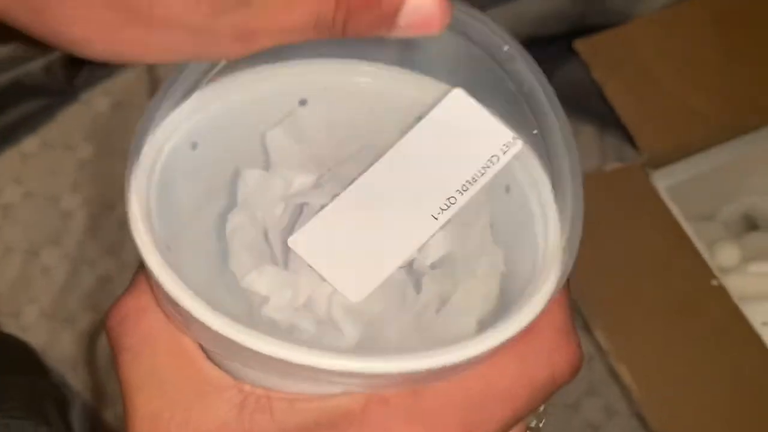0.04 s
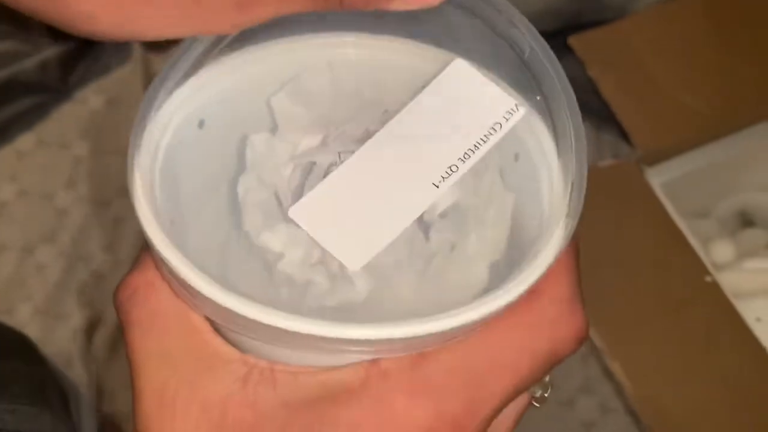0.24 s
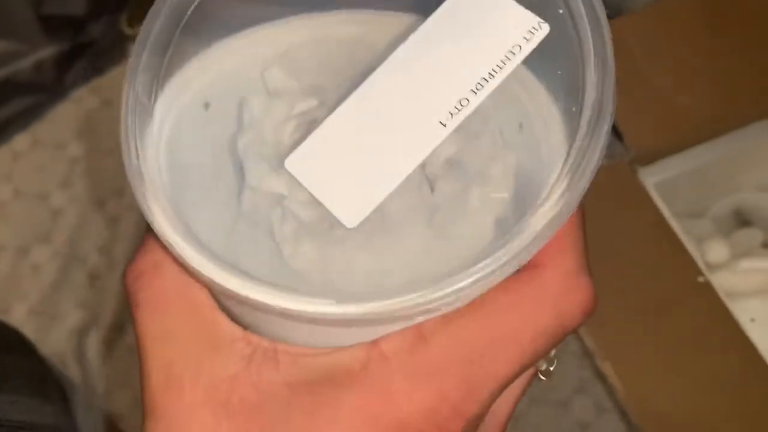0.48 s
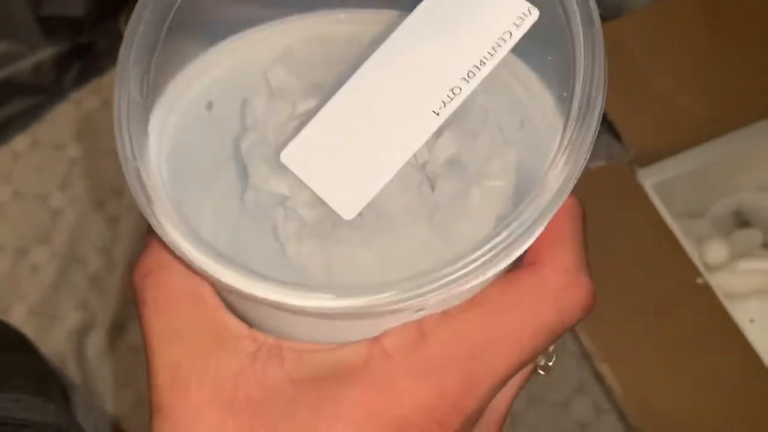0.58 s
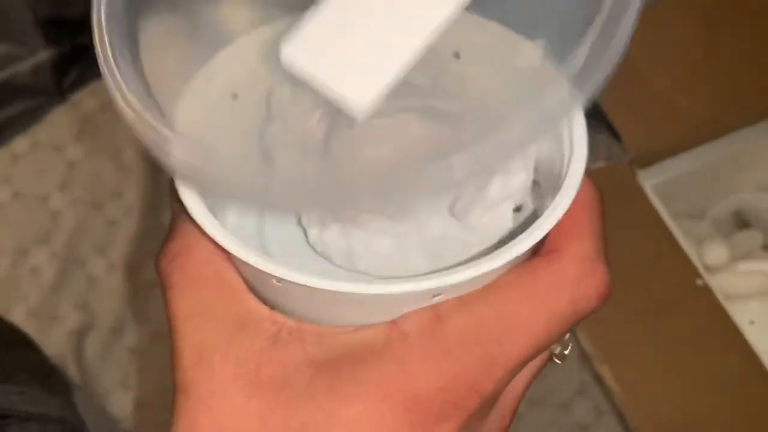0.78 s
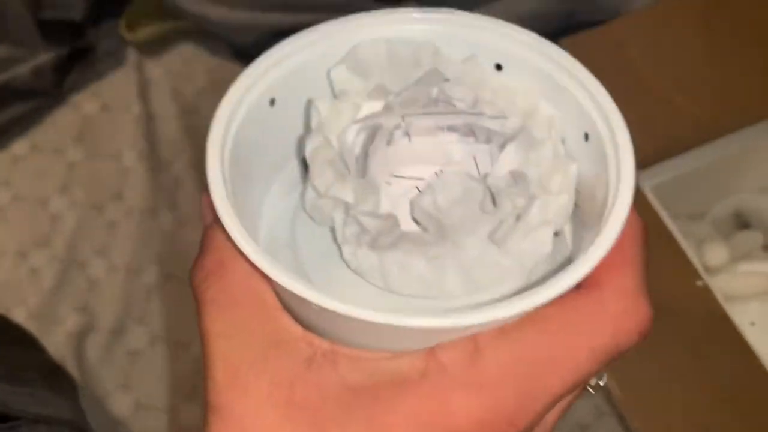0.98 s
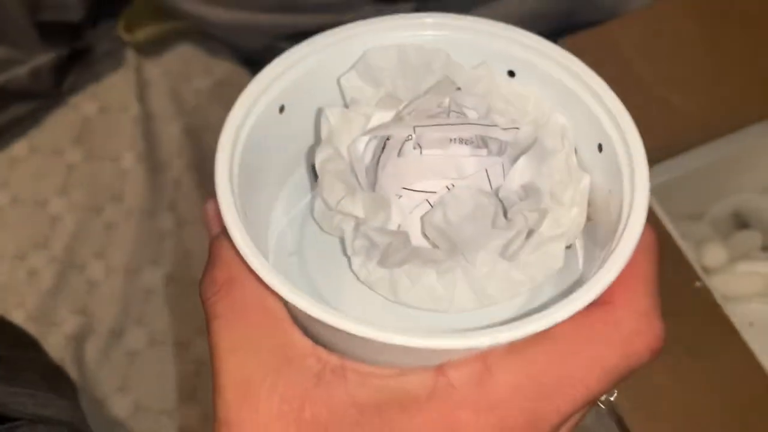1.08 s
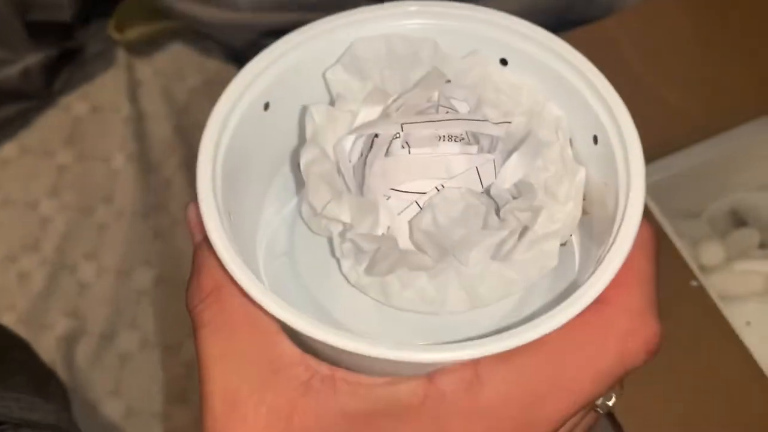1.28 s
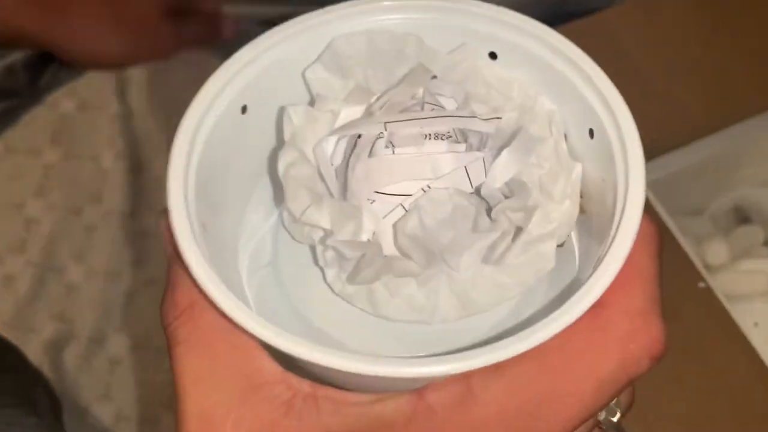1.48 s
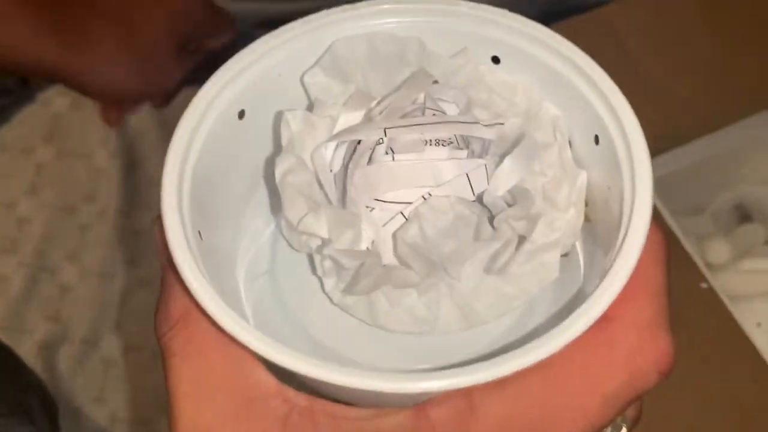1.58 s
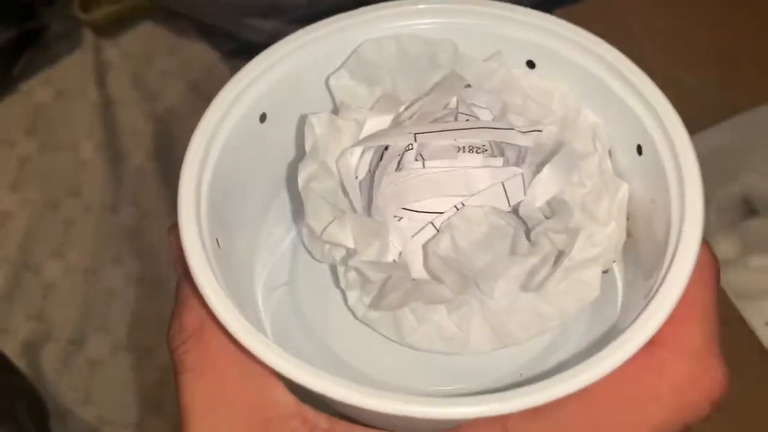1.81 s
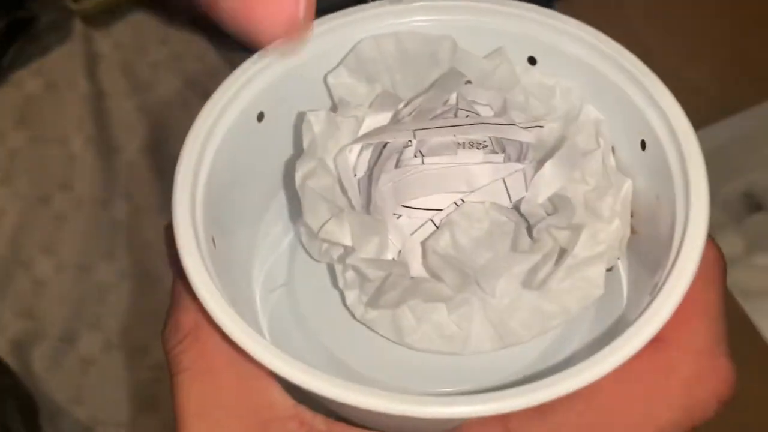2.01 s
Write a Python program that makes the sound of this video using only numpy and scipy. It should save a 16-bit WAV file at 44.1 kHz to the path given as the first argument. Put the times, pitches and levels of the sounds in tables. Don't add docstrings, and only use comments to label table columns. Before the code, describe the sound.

Close to a phone in stereo, a plastic lid creaks and cracks loose from a cup with a low airy thump and very short echo, then soft ticks, scuffs and a muffled knock over faint low hum.

```python
import sys
import numpy as np
from scipy import signal
from scipy.fft import rfft, irfft, next_fast_len
from scipy.io import wavfile
from scipy.ndimage import uniform_filter1d

SR = 44100
rng = np.random.default_rng(int(sys.argv[2]) if len(sys.argv) > 2 else 0)


def materialize(psi):
    bounded = np.clip(np.atleast_2d(psi).T, -1, 1)
    quanta = np.round(bounded * 32767).astype(np.int16)
    wavfile.write(sys.argv[1], SR, quanta)


def volts_from_decibels(level):
    exponent = np.asarray(level, float) / 20
    return 10 ** exponent


N = 90404
T = np.arange(N) / SR
LONG, SHORT = 4096, 512

# pitch in Hz, level in dB, time to fade by 60 dB in seconds.
RIM_MODES = [(2680, -1, 0.0027), (4110, -5.5, 0.0034), (4900, -10.5, 0.0022), (5440, -2, 0.005),
             (6830, -4.5, 0.0035), (8870, 7, 0.0039), (10120, 0, 0.0031), (12070, 0, 0.0011),
             (14070, -9, 0.003), (15600, -5, 0.0022)]


def unit(x):
    return x / np.sqrt(np.mean(x ** 2))


def curve(rows):
    return np.interp(T, *np.array(rows).T[:2])


def band(x, hz, width):
    hz = min(hz, .45 * SR)
    return signal.lfilter(*signal.iirpeak(hz, hz / width, fs=SR), x)


def walk(rate):
    hold = int(SR / rate)
    steps = np.repeat(rng.standard_normal(N // hold + 1), hold)
    return 1.18 * uniform_filter1d(uniform_filter1d(steps, hold), hold)[:N]


def bump(t, peak_s, sharp):
    return (t / peak_s * np.exp(1 - t / peak_s)) ** sharp


def ring(modes, luck, t, sag=0):
    sag_s, scatter_db = 0.0047, 3
    bent = t + sag * sag_s * (1 - np.exp(-t / sag_s))
    hz, db, t60 = np.array(modes).T[:, :, None]
    size = volts_from_decibels(db + scatter_db * luck[:len(modes), None])
    detuned = hz * (1 + 0.013 * luck[::-1][:len(modes), None])
    fade = np.exp(-np.log(1000) * t / t60)
    return np.sum(size * np.sin(2 * np.pi * detuned * bent) * fade, axis=0)


def ports(x, lean):
    # frequency in Hz, lead of the left port in radians.
    port_phase = [(0, 0.5), (1030, -0.33), (2070, 5.5), (2840, 3.5), (3530, 7.5), (4570, 0.06), (5510, 3),
                  (5940, -1.2), (6890, -1.3), (7750, -2), (12400, -8.5), (14400, -8), (15300, -12),
                  (16700, -7.5)]
    # frequency in Hz, left minus right level in dB.
    port_db = [(60, 2.5), (110, 6), (200, 1.5), (380, 7), (700, 12.5), (1290, 5.5), (2380, 0.5),
               (4400, -10), (8120, 2), (15000, -1)]
    size = next_fast_len(N + LONG)
    f = np.arange(size // 2 + 1) * SR / size
    louder = volts_from_decibels(lean * np.interp(f, *np.array(port_db).T) / 2)
    left = louder * np.exp(.5j * np.interp(f, *np.array(port_phase).T))
    return irfft(rfft(x, size) * np.array([left, 1 / left]), size)[:, :N]


def snaps():
    # start in seconds, tick level in dB, wall ring level in dB,
    # wall brightness in dB per octave, lid flex level in dB.
    slips = [(.003, -47.5, -37, -8.5, -60.5), (.065, -79, -48, -4, -70), (0.101, -63.5, -62, 0, -62),
             (0.194, -38, -31.5, 6.5, -32), (0.2078, -31, -26, 3.5, -53), (.2105, -39.5, -37, 11.5, -24),
             (.2172, -31.5, -38, 11.5, -63), (0.2237, -17, -16, 1, -11.5), (.2292, -19.5, -13, -2, -24),
             (.2385, -55.5, -26, -2, -33), (0.2587, -39, -42, 5.5, -41.5), (0.326, -58, -71, -3, -77),
             (.6062, -44.5, -48, 4, -57), (.6110, -46.5, -70, -0.5, -39), (0.613, -50.5, -41, 7.5, -62),
             (0.6212, -55.5, -50, 6, -68), (.661, -63, -60, 2.5, -54), (1.0533, -47.5, -59, 11, -55.5),
             (1.0608, -53.5, -53.5, 9, -59), (1.6458, -69, -51, 1.5, -60), (1.6504, -64.5, -60, -6, -44.5),
             (1.675, -50, -41.5, -4, -50), (1.683, -54, -51.5, -1, -46.5)]
    # pitch in Hz, level in dB, time to fade by 60 dB in seconds.
    wall_modes = [(301, -5.5, 0.027), (400, -1.5, 0.017), (607, -11, 0.0355), (702.6, 0.5, 0.046),
                  (847, -5, 0.0153), (981, -5, 0.02), (1040, -7.5, 0.019), (1310, -8.5, 0.014),
                  (1640, -3, 0.014), (2104, -11.5, 0.018), (2660, -17.5, .01), (3435, -26.5, 0.016)]
    tick_s, strike_s = 0.00069, 0.0014
    flex_from_hz, flex_to_hz, flex_sag_s = 386, 103, 0.0048
    lid_off_s, cloth_damp = 1.3, 0.49
    out = np.zeros(N + LONG)
    t = np.arange(LONG) / SR
    t_tick = t[:SHORT]
    turns = flex_to_hz * t + (flex_from_hz - flex_to_hz) * flex_sag_s * (1 - np.exp(-t / flex_sag_s))
    lid = bump(t, peak_s=0.005, sharp=1.74) * np.sin(2 * np.pi * turns)

    for at, tick_db, wall_db, bright_db, lid_db in slips:
        rim_luck, wall_luck = rng.standard_normal((2, 12))
        rough = rng.standard_normal(SHORT)
        grit = rough * bump(t_tick, tick_s, 0.91)
        knock = rough * bump(t_tick, strike_s, 0.91)
        grit = grit / np.linalg.norm(grit)
        knock = knock / np.linalg.norm(knock)

        rim = ring(RIM_MODES, rim_luck, t_tick) + 2.5 * (t_tick == 0)
        damp = cloth_damp if at > lid_off_s else 1
        modes = [(hz, db + bright_db * np.log2(hz / 700), t60 * damp) for hz, db, t60 in wall_modes]
        wall = np.convolve(ring(modes, wall_luck, t, sag=0.072), knock)[:LONG]

        i = int(at * SR)
        out[i:i + LONG] += volts_from_decibels(wall_db - 8.5) * wall + volts_from_decibels(lid_db) * lid
        out[i:i + 2 * SHORT - 1] += volts_from_decibels(tick_db - 2) * np.convolve(rim, grit)
    return out[:N]


def thumps():
    # start in seconds, level in dB.
    deep_swells = [
        (0.223, -20),
        (0.614, -44.5),
        (1.682, -49.5),
    ]
    rise_s, hold_s, fall_s = 0.015, 0.016, 0.011
    out = np.zeros(N + LONG)
    t = np.arange(LONG) / SR
    rise = np.clip(t / rise_s, 0, 1) ** 2
    fall = np.exp(-np.clip(t - rise_s - hold_s, 0, None) / fall_s)
    air = rise * fall * np.exp(-t / 0.031) * np.cos(2 * np.pi * 65 * (t - 0.0288))
    for at, db in deep_swells:
        i = int(at * SR)
        out[i:i + LONG] += volts_from_decibels(db + 5.5) * air
    return out[:N]


def squeak():
    start_s, peak_s, end_s = .2, .2105, .2135
    from_hz, to_hz = 380, 1340
    along = np.clip((T - start_s) / (end_s - start_s), 0, 1)
    phase = 2 * np.pi * np.cumsum(from_hz * (to_hz / from_hz) ** along) / SR
    db = np.interp(T, [start_s - .003, start_s, peak_s, end_s + 0.0014], [-60, -15.5, 0, -24])
    gate = (T < end_s + .003) * (T > start_s - .003)
    return volts_from_decibels(-28 + db) * gate * (np.sin(phase) + .15 * np.sin(2 * phase))


def creak():
    # time in seconds, level in dB.
    creep = [(.17, -78), (.191, -61), (.195, -52.5), (.203, -49.5), (.21, -47), (.214, -58), (.222, -50),
             (.227, -45), (.232, -42.5), (.235, -55.5), (.247, -75), (.27, -63.5), (.345, -84)]
    grains_per_s, scatter_db = 4700, 3.5
    chance, luck, side = rng.random((3, N))
    size = volts_from_decibels(scatter_db * np.minimum(-np.log(1 - luck), 3))
    grains = (chance < grains_per_s / SR) * size * np.sign(side - .5)
    rim = sum(volts_from_decibels(db) * band(grains, hz, hz / 0.78) for hz, db, _ in RIM_MODES)
    wall = volts_from_decibels(3.0) * band(grains, 900, 1000)
    gate = (T > creep[0][0]) & (T < creep[-1][0])
    return unit(rim + wall) * volts_from_decibels(curve(creep) + 4.5) * gate


def scuffs():
    middles = [.011, .045, .07, .101, .102, .106, .442, .463, .578, .607, .611, .9, 1.061, 1.0615, 1.1,
               1.647, 1.648, 1.6765, 1.688]
    # length in seconds, pitch in Hz, level in dB.
    touches = [(0.02, 629, -50), (0.032, 320, -56), (0.026, 1390, -51), (0.054, 458.4, -53),
               (0.018, 1200, -53.5), (0.03, 312, -55), (0.062, 410, -58), (0.041, 290, -55.5),
               (0.016, 10200, -61), (0.0053, 900, -47), (0.012, 630, -50.5), (.15, 6850, -61.5),
               (.004, 6500, -50), (0.0056, 3570, -46), (0.12, 6740, -63.5), (0.0046, 1200, -49.5),
               (0.017, 6700, -52.5), (.004, 3230, -53), (0.011, 9000, -54)]
    sharpness, rough, note_below_hz = 7.2, 0.3, 3000
    out = 0
    for mid, (length, hz, db) in zip(middles, touches):
        width = hz / sharpness
        grit = unit(band(band(rng.standard_normal(N), hz, width), hz, width))
        note = np.sin(2 * np.pi * hz * T + 1.26 * walk(60))
        swell = np.exp(-(2 * (T - mid) / length) ** 2)
        out = out + volts_from_decibels(db) * (note * (hz < note_below_hz) + rough * grit) * swell
    return out


def rub():
    # time in seconds, level in dB.
    rub_level = [(0, -53), (.05, -72), (.16, -76.5), (.55, -74.5), (.585, -72.5), (.64, -78), (.79, -82),
                 (.83, -62), (.94, -66.5), (.99, -68), (1.06, -61), (1.15, -72), (1.22, -78.5), (1.33, -72),
                 (1.62, -86), (1.645, -63), (1.7, -71), (1.76, -75.5)]
    # centre in Hz, width in Hz, level in dB.
    colour = [(3340, 1000, 0), (4820, 1200, 6), (6960, 900, 1), (9300, 1700, -1.5), (10390, 2700, -9.5),
              (12470, 3300, -2.5), (15260, 1220, -18), (1723, 3700, 3.5)]
    grit = rng.standard_normal(N) * volts_from_decibels(1.5 * walk(300))
    hiss = sum(volts_from_decibels(db + 0.39 * walk(14.5)) * band(grit, hz, width) for hz, width, db in colour)
    return unit(hiss) * volts_from_decibels(curve(rub_level) - 1)


def echo(hits):
    echo_hz = (396, 5900)
    t = T[:4 * LONG]
    tail = signal.lfilter(*signal.butter(2, echo_hz, "band", fs=SR), rng.standard_normal((2, len(t))))
    tail = tail * np.exp(-np.log(1000) * t / .2) * np.clip(t / 0.012, 0, 1)
    tail = tail / np.sqrt(np.sum(tail ** 2) / 2)
    return volts_from_decibels(-23) * signal.fftconvolve(hits[None], tail, axes=1)[:, :N]


def room():
    # frequency in Hz, level in dB per Hz.
    air_level = [(55, -91.5), (85, -82.5), (170, -87), (260, -92), (380, -89.5), (1500, -95.5),
                 (2400, -104), (6000, -121), (16000, -140)]
    # frequency in Hz, share of the noise that is unlike at the two ports.
    unlike = [(60, 0.014), (300, 0.51), (1000, 1), (3000, 1), (7000, 0.037)]
    # time in seconds, level in dB.
    stir = [(0, 10), (.12, 5), (.17, 4), (.3, 7.5), (.36, 2.5), (.45, 3.5), (1, 2.5), (1.6, 1.5),
            (1.69, 3.5), (1.78, 1), (2.05, 0.5)]
    # hum pitch in Hz, level in dB, flutter in dB.
    hum_notes = [(59.3, -62, 3), (120.1, -56, 1)]
    # time in seconds, hum level in dB.
    hum_level = [(0, -3), (.35, -5.5), (.7, -1), (1.45, -1), (1.6, -4.5), (2.05, -5)]

    def at(rows, hz):
        table_hz, value = np.array(rows).T
        return np.interp(np.log(hz), np.log(table_hz), value)

    same, different, swell = 0, 0, walk(1.6)
    for hz in 40 * 2 ** (np.arange(27) / 3):
        gain = volts_from_decibels(at(air_level, hz) + 0.75 * swell + 1.0 * walk(8.4))
        noises = rng.standard_normal((3, N))
        both, left, right = (band(band(v, hz, hz / 3), hz, hz / 3) * gain for v in noises)
        share = np.clip(at(unlike, hz), 0, 1)
        same = same + np.sqrt(1 - share) * both
        different = different + np.sqrt(share) * np.array([left, right])
    air = unit(ports(same, lean=0.078) + different) * volts_from_decibels(-58.5 + curve(stir))

    hum = 0
    for hz, db, flutter_db in hum_notes:
        level = volts_from_decibels(db + 6 + flutter_db * walk(14))
        hum = hum + level * np.sin(2 * np.pi * hz * T + 0.44 * walk(10.0))
    return air + hum * volts_from_decibels(curve(hum_level))


def scene():
    hits = snaps() + thumps() + squeak() + creak()
    hands = scuffs() + rub()
    return ports(hits, lean=0.92) + ports(hands, lean=0.53) + echo(hits) + room()


def top_cut(x):
    return signal.sosfilt(signal.butter(12, 17100, fs=SR, output="sos"), x)


def record(dry):
    low_cut_hz, top_hz = 35, 16320
    x = signal.sosfilt(signal.butter(3, low_cut_hz, "high", fs=SR, output="sos"), dry)
    x = signal.sosfilt(signal.ellip(6, .3, 24, top_hz, fs=SR, output="sos"), x)
    return top_cut(x)


dry = scene()
out = record(dry)
materialize(out)
```